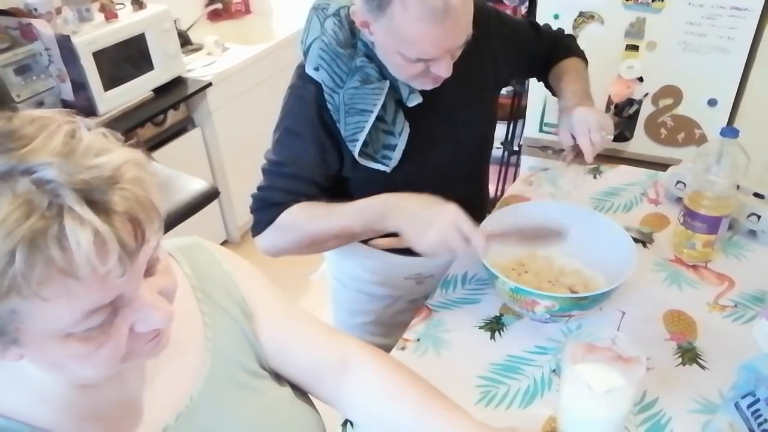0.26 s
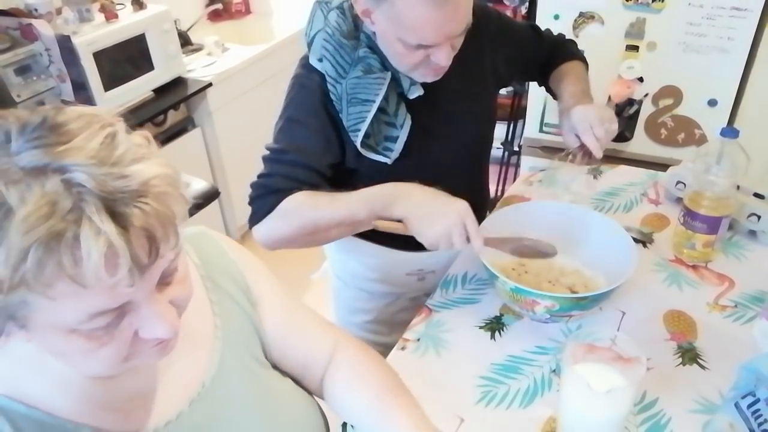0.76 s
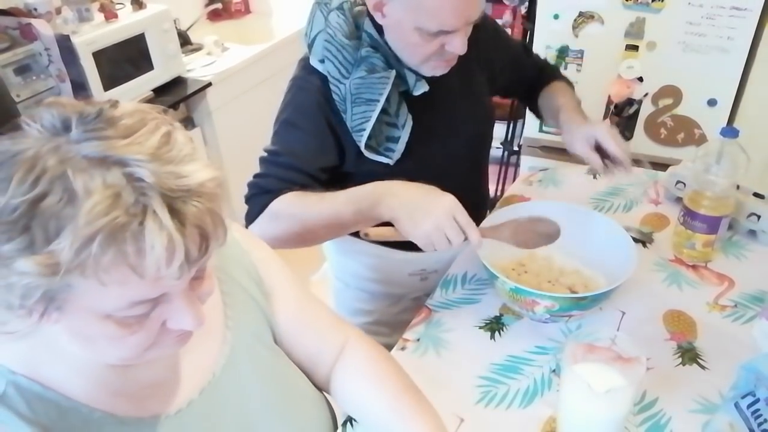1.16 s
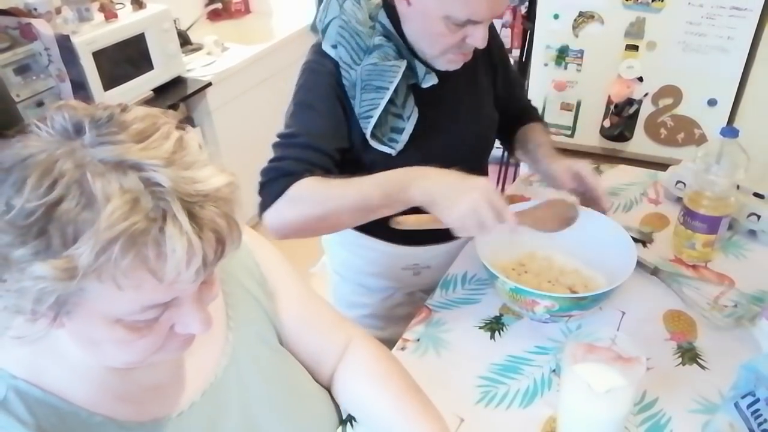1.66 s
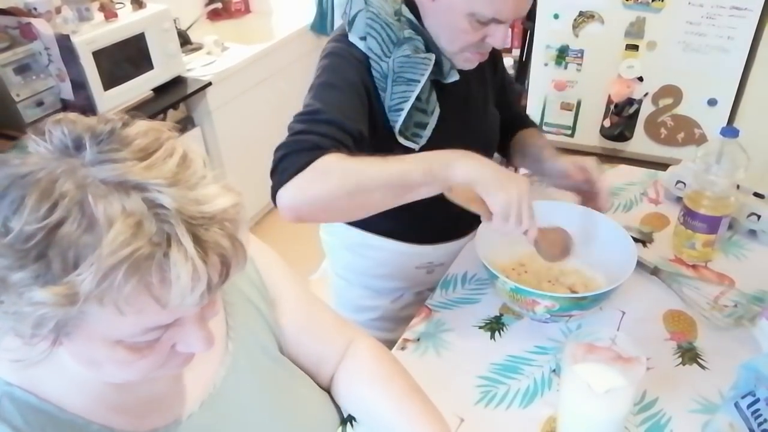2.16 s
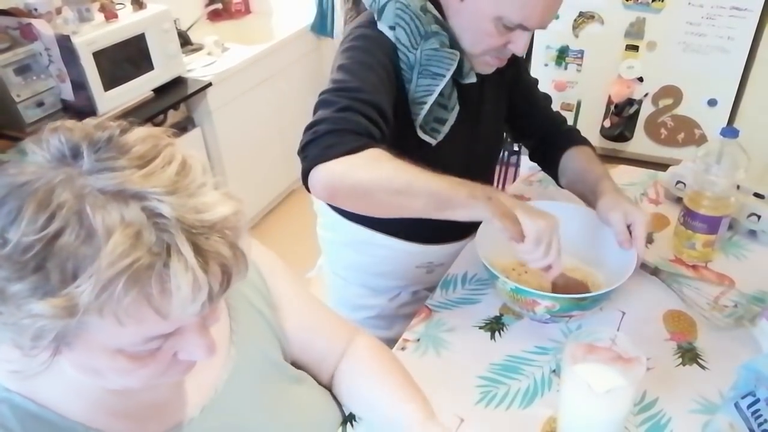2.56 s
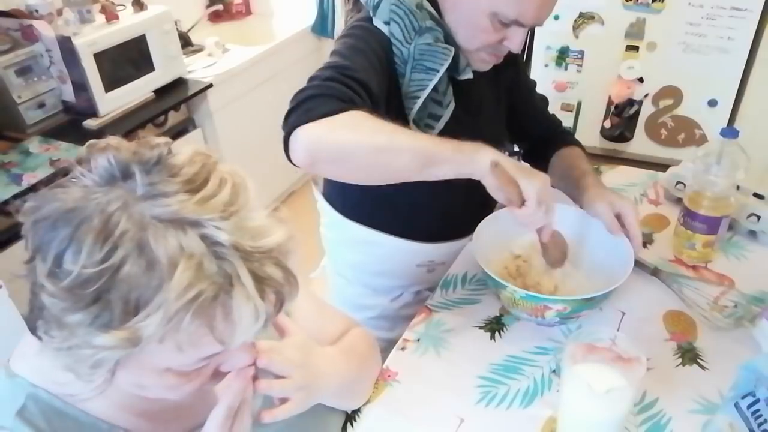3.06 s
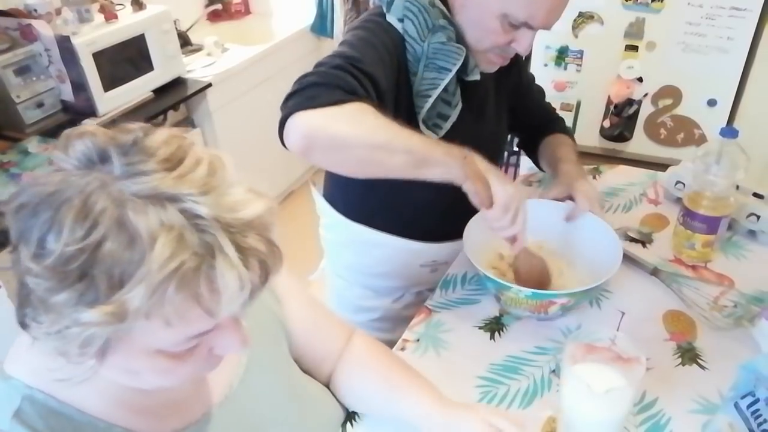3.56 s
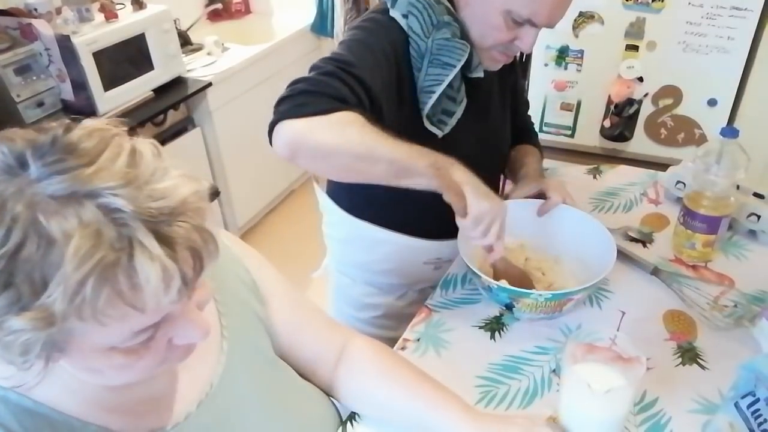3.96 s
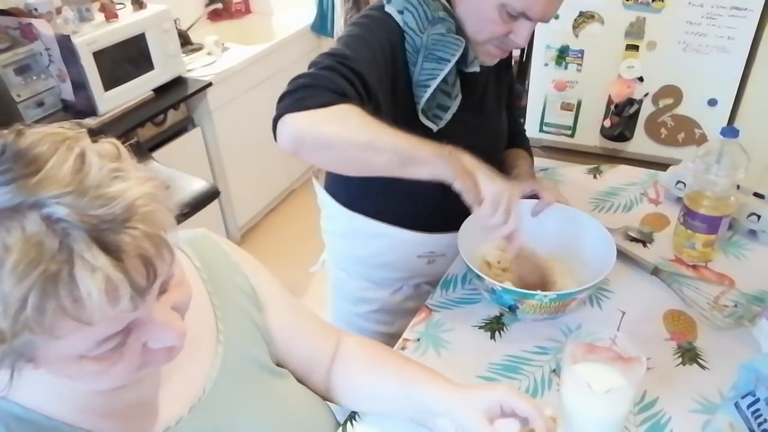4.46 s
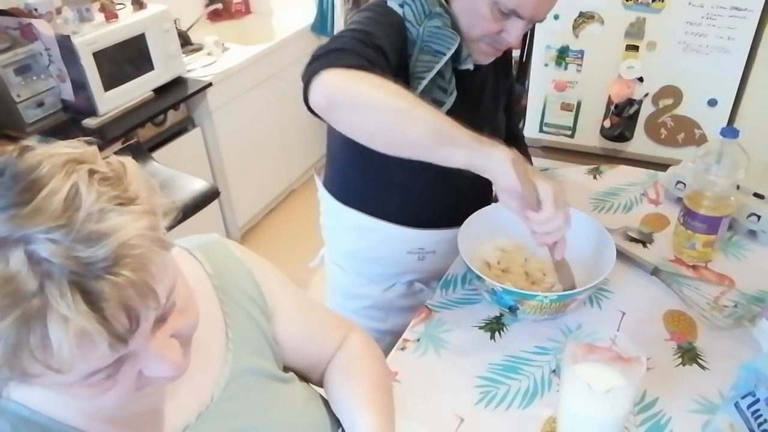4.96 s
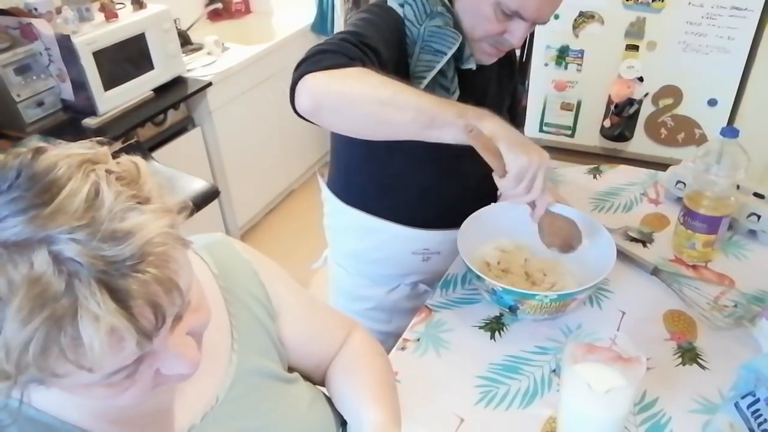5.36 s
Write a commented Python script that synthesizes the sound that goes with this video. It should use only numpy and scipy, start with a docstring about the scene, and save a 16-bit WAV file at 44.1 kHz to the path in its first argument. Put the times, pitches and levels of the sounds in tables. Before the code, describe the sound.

A small kitchen with faint air noise and a low hum is heard about a metre from the table, with most sounds slightly right of centre. For the first 1.5 seconds something rustles and crinkles in a hand, with light, sharp clicks and a few soft knocks on a plastic bowl between 0.6 and 0.9 seconds. At about 1.6 seconds a utensil lands hard on the table and bounces briefly, the loudest sound. A soft bump follows near 1.9 seconds. From 2.4 seconds a wooden spoon stirs batter, starting with a dull knock and gritty scraping round the bowl. Uneven thuds come thicker from 3.3 to 5 seconds, strongest around 3.8, 4.4, 4.7 and 5 seconds, with a light sliding hiss between them. Several small, bright clicks close the stirring from 5 to 5.5 seconds.

```python
"""A kitchen table, a metre or so from a stereo microphone, in a small, bright room with a low hum.
First things rustle and crinkle in the hand, with light clicks and a few soft knocks on a plastic bowl.
At about 1.6 s a utensil is put down hard on the table and bounces. From 2.4 s a wooden spoon works
batter, thudding through it against the bowl and scraping round the wall. More clicks come at the end."""
import sys
import numpy as np
from scipy import signal
from scipy.fft import rfft, irfft
from scipy.io import wavfile
from scipy.ndimage import uniform_filter1d

SR = 44100
rng = np.random.default_rng(int(sys.argv[2]) if len(sys.argv) > 2 else 0)


def digitize_waveform(pressure):
    """Quantize a signal to 16-bit integers and store it at the path in sys.argv[1].

    Rows of a 2-D input are taken as channels; values are limited to [-1, 1].
    """
    field = np.atleast_2d(pressure).T
    bounded = np.clip(field, -1, 1)
    quanta = np.round(bounded * 32767).astype(np.int16)
    wavfile.write(sys.argv[1], SR, quanta)


N = 246519
TIME = np.arange(N) / SR
RING_TIME = np.arange(SR * 3 // 4) / SR  # time axis of one hit and its decay


def undb(db):
    """Decibels to gain."""
    return 10 ** (np.asarray(db) / 20)


def unit_rms(x):
    """Scale to rms 1."""
    return x / np.sqrt(np.mean(x ** 2))


def unit_hit(x):
    """Scale a hit to the energy of 10 ms at rms 1."""
    return x / np.sqrt(np.sum(x ** 2) / (SR / 100))


def along(points, hz):
    """Read (Hz, value) points on a log-frequency axis."""
    point_hz, value = np.transpose(points)
    return np.interp(np.log(np.maximum(hz, 1)), np.log(point_hz), value)


def colour(x, points):
    """Minimum-phase filter with the given (Hz, dB) response."""
    size = 4096
    gain = undb(along(points, np.arange(size // 2 + 1) * SR / size))
    cepstrum = irfft(np.log(gain))
    cepstrum[1:size // 2] *= 2
    cepstrum[size // 2 + 1:] = 0
    impulse_response = irfft(np.exp(rfft(cepstrum)))
    return signal.fftconvolve(x, impulse_response)[:len(x)]


def lowpass(x, hz, order):
    """Butterworth low-pass."""
    return signal.sosfilt(signal.butter(order, min(hz, SR / 3), fs=SR, output="sos"), x)


def fade(t60):
    """Exponential decay by 60 dB in t60 seconds."""
    return np.exp(-np.log(1000) * RING_TIME / t60)


def ring(modes, longest_t60=.38):
    """Struck modes, each dying away within longest_t60; neighbours swing in opposite senses."""
    return sum((-1) ** k * undb(db) * fade(min(t60, longest_t60)) * np.sin(2 * np.pi * hz * RING_TIME)
               for k, (hz, db, t60) in enumerate(modes))


def add(track, start, x):
    """Mix x into the track from start, in seconds."""
    i = int(start * SR)
    track[i:i + len(x)] += x[:N - i]


def pan(x, right_db):
    """Make the right channel right_db louder than the left."""
    return x * undb(np.array([[-right_db], [right_db]]) / 2)


def wander(rate_hz):
    """Random drift of rms 1 that takes a new turn rate_hz times a second."""
    hold = int(SR / rate_hz)
    steps = np.repeat(rng.standard_normal(N // hold + 1), hold)
    return unit_rms(uniform_filter1d(steps, hold)[:N])


def diffuse(size, alike_hz=700):
    """Noise from all round the microphone: the bass is alike in both channels, the treble unrelated."""
    hz = np.arange(size // 2 + 1) * SR / size
    alike = .85 / (1 + (hz / alike_hz) ** 4)
    mid, side = rfft(rng.standard_normal((2, size)))
    common = mid * np.sqrt((1 + alike) / 2)
    opposed = side * np.sqrt((1 - alike) / 2)
    return irfft(np.array([common + opposed, common - opposed]), size)


def gesture(start, length, attack_s, t60):
    """Envelope of one movement: attack, hold, release."""
    t = TIME - start
    release = np.exp(-np.log(1000) * np.maximum(t - length, 0) / t60)
    return np.clip(t / attack_s, 0, 1) * release


def friction(spectrum):
    """Countless tiny slips of uneven size, reaching the microphone mostly by way of the walls."""
    slips = undb(2 * wander(600) + .8 * wander(35))
    return unit_rms(np.array([colour(channel * slips, spectrum) for channel in diffuse(N)]))


# air of the quiet kitchen: (frequency [Hz], relative level [dB])
AIR_SPECTRUM = [(12, -42), (25, -6), (60, -8), (130, -2.5), (200, -13.5), (370, -12.5), (700, -18),
                (1050, -19), (1400, -25.5), (2900, -26.5), (4200, -33.5), (5200, -26), (7500, -29.5),
                (9000, -38), (13000, -39), (15000, -39.5)]
# faint tones that come and go: (start [s], length [s], frequency [Hz], peak level [dB])
FAINT_TONES = [(0.187, 0.25, 357, -64.5), (0.522, .13, 426, -70), (1.818, 0.28, 372.5, -62),
               (1.95, 0.25, 835, -72.5)]


def room_tone(air_db=-63.5, hum_hz=93, hum_db=-73):
    """Quiet air all round the microphone, with a low wavering hum and a few faint tones in the centre."""
    air = unit_rms(np.array([colour(channel, AIR_SPECTRUM) for channel in diffuse(N)]))
    air *= undb(air_db + .6 * wander(3))
    hum_phase = 2 * np.pi * np.cumsum(hum_hz + 3 * wander(6)) / SR
    tones = np.sin(hum_phase) * undb(hum_db + 2.5 * wander(3.6))
    for start, length, hz, db in FAINT_TONES:
        t = TIME[:int(length * SR)]
        swell = undb(db) * np.sin(np.pi * t / length)
        add(tones, start, swell * np.sin(2 * np.pi * hz * t))
    return air + tones


# movements of the hand: (start [s], length [s], level [dB])
HAND_MOVES = [(0.035, 0.12, -71), (0.129, 0.07, -61.5), (1.025, .19, -58), (1.371, .17, -59.5)]
# things rubbing in the hand: (frequency [Hz], relative level [dB])
RUSTLE_SPECTRUM = [(100, -55), (400, -30), (1200, -12), (3000, -1), (4200, -10), (5500, 5), (7800, 1),
                   (10000, -12), (15000, -11)]


def rustle(attack_s=0.014, t60=0.33):
    """Things shift in the hand and rub together, centred ahead of the microphone."""
    effort = sum(undb(db) * gesture(start, length, attack_s, t60) for start, length, db in HAND_MOVES)
    return friction(RUSTLE_SPECTRUM) * effort


def crinkles(count=5, below_rustle_db=6, scatter_db=3.5, ring_hz=6100, spread_octaves=0.34):
    """A few tiny clicks fall at random in each rustle; returns rows like those of LIGHT_CLICKS."""
    body_db, snap_db, clink_db = -8, -2, -20
    rows = []
    for start, length, rustle_db in HAND_MOVES:
        for when, (size, pitch) in zip(rng.random(count), rng.standard_normal((count, 2))):
            db = rustle_db - below_rustle_db + scatter_db * size
            hz = ring_hz * 2 ** (spread_octaves * pitch)
            rows.append((start + when * length, db, hz, body_db, snap_db, clink_db))
    return rows


# light hard contacts, the last three columns relative to the ring:
# (time [s], level [dB], ring pitch [Hz], body [dB], snap [dB], clink [dB])
LIGHT_CLICKS = [(.245, -43.5, 8040, -24, -12, -20), (.2485, -39.5, 5460, -17, -21, -20),
                (.511, -41.5, 5000, -18, -4, 7), (.7542, -42.5, 4880, -25, -7, -1.5),
                (.9875, -42.5, 5240, -36, -10, -4), (1.024, -43, 4470, 6, 1.5, -20),
                (1.028, -45, 5560, -3, 4, -20), (1.037, -42, 5330, -7, -5, -20),
                (1.049, -44.5, 5840, -13, 2, -22), (1.085, -43, 5500, -34, -5, -25),
                (1.1542, -50, 6500, -6, 2.5, -16), (1.170, -43, 5900, -14.5, -21, -27),
                (1.175, -45, 5400, -5, 7, -22), (1.209, -49.5, 5570, -15, -9, -31),
                (1.369, -72, 6500, 17, 17, -20), (1.4096, -40.5, 5170, -6.5, -3.5, -9),
                (1.4349, -50, 5200, 8.5, 10, -26), (3.349, -57.5, 5770, -9, -5, -10),
                (4.387, -66, 5500, -6, -11, -18), (4.745, -51.5, 6940, -15, -4, -9),
                (5.0408, -49.5, 7200, 7, 25, -20), (5.229, -58, 5900, -15, -9, -21),
                (5.3369, -42, 5680, -22.5, -15, -31), (5.4124, -45, 5800, -18, -8.5, -11),
                (5.4442, -47.5, 6860, -31, 12, 0), (5.4916, -38.5, 5780, -10.5, -11.5, -38)]
# damped ring of a click: (frequency [multiple of the ring pitch], relative level [dB])
CLICK_PARTIALS = [(0.591, -4), (0.791, -2.5), (0.997, -0.5), (1.28, -7.5)]
# mid-range body and bright snap of a click, each: (frequency [Hz], relative level [dB])
BODY_SPECTRUM = [(300, -50), (700, -1), (1200, -2), (1900, 2.5), (2900, 11), (3600, 8), (5000, -5.5),
                 (9000, -8)]
SNAP_SPECTRUM = [(2000, -55), (6000, 2.5), (9000, 4), (12000, -3), (15000, -1.5), (16000, -34)]
# clink that lingers after a click: (frequency [Hz], relative level [dB], t60 [s])
CLINK_MODES = [(1620, -22.5, 0.031), (2805, -6, 0.034), (3100, -11, .02), (3850, -3, .02), (4380, -15, .02),
               (4960, 4, 0.034), (5200, 2.5, 0.023), (5400, -21, 0.027), (6190, 6, .03), (6660, 6, 0.02),
               (7140, -7, 0.026), (7180, -2.5, 0.039), (7900, -5.5, .035), (8260, -7.5, 0.018)]


def clicks(ring_t60=0.0016, clink_scatter_db=6.0):
    """Hard contacts right of centre, each with a damped ring, a body, a snap and a lingering clink."""
    direct = np.zeros(N)
    tick = signal.unit_impulse(len(RING_TIME))
    body = unit_hit(colour(tick, BODY_SPECTRUM))
    snap = unit_hit(colour(tick, SNAP_SPECTRUM))
    clink_partials = np.array([(-1) ** k * ring([mode]) for k, mode in enumerate(CLINK_MODES)])
    contacts = list(LIGHT_CLICKS) + crinkles()
    spots = rng.standard_normal((len(contacts), len(CLINK_MODES)))  # each spot brings out other modes
    for (start, db, ring_hz, body_db, snap_db, clink_db), spot in zip(contacts, spots):
        modes = [(ring_hz * ratio, mode_db, ring_t60) for ratio, mode_db in CLICK_PARTIALS]
        tone = unit_hit(lowpass(np.diff(ring(modes), prepend=0), 8500, order=8))
        clink = unit_hit(undb(clink_scatter_db * spot) @ clink_partials)
        click = tone + undb(body_db) * body - undb(snap_db) * snap + undb(clink_db) * clink
        add(direct, start, undb(db) * unit_hit(click))
    return pan(table_top(direct, echo_db=3, t60=.02) + kitchen(direct), right_db=4.5)


def table_top(x, echo_db, t60=0.013):
    """Direct sound at the microphone with a brief scatter off the table and the things standing on it."""
    scatter = diffuse(len(RING_TIME)) * fade(t60)
    scatter /= np.linalg.norm(scatter, axis=1, keepdims=True)
    echoes = signal.fftconvolve(x[None], scatter, axes=1)[:, :N]
    return (x + undb(echo_db) * echoes) / np.hypot(1, undb(echo_db))


# decay of the small kitchen: (band centre [Hz], t60 [s])
KITCHEN_DECAY = [(100, 0.41), (400, 0.2), (1200, 0.34), (3000, 0.31), (7000, 0.29), (15000, 0.24)]


def kitchen(x, gap_s=0.0043, build_s=0.00067):
    """Reverberation reaches the microphone a few ms after the direct sound; the bass lasts longest."""
    size = len(RING_TIME)
    hz = np.arange(size // 2 + 1) * SR / size
    noise_spectrum = rfft(diffuse(size))
    centres = np.array(KITCHEN_DECAY)[:, 0]
    onset = np.clip((RING_TIME - gap_s) / build_s, 0, 1)
    tail = 0
    for share, (_, t60) in zip(np.eye(len(centres)), KITCHEN_DECAY):
        band = irfft(noise_spectrum * along(np.c_[centres, share], hz), size)
        envelope = fade(t60) * onset
        tail = tail + band * envelope / np.linalg.norm(envelope)
    return signal.fftconvolve(x[None], tail, axes=1)[:, :N]


# spoon against the bowl, the last three columns as trims on each part's own gain:
# (time [s], level [dB], contact cut-off [Hz], table thump [dB], wall rattle [dB], thud into room [dB])
SPOON_KNOCKS = [(.597, -49.5, 84.4, -4, -20.5, 0), (0.657, -54, 122, 6, -42, 1),
                (0.875, -58, 120, -4, -41, 5), (1.941, -45.5, 210, 9.5, -30, 1),
                (2.412, -29.5, 700, -8, -28.5, -3), (3.285, -42, 265, -28, -24, 3),
                (3.338, -53.5, 382, 9.5, -22, 11), (3.738, -47.5, 251, -21, -32, 8.5),
                (3.758, -29.5, 634, -21, -18.5, -0.5), (3.84, -39.5, 243, -4.5, -26, -6),
                (4.277, -35.5, 700, -8.5, -36, 0.5), (4.384, -31.5, 300, 1.5, -28, -1.5),
                (4.480, -46, 141, -6, -39, -4), (4.506, -46.5, 396, 13, -37, -1),
                (4.612, -44.5, 270, 10, -27, 3.5), (4.647, -47, 513, 6, -10, 1.5),
                (4.686, -32.5, 251, 0, -43, -4), (4.990, -29, 1460, -14.5, -45, -5)]
# the bowl, the table under it and the bowl's rattling wall, each:
# (frequency [Hz], relative level [dB], t60 [s], capped at longest_t60)
BOWL_MODES = [(207.8, 2.5, 0.043), (215.4, -3, 0.16), (252, -21, 0.9), (347, -15, 0.45), (367, -16, 0.43),
              (422, 7, 0.039), (493, -6.5, 0.096), (537, -5.5, 0.22), (633.3, -1, 0.1), (624, 7, 0.039),
              (732, -7.5, 0.18), (784, 5.5, 0.025), (1083, 7.5, 0.028)]
TABLE_MODES = [(77.5, 0, 0.27), (92, -0.5, 0.045), (124.7, -8.5, 0.18), (171, -15, 0.054)]
WALL_MODES = [(2140, 12, 0.014), (2420, 4, 0.033), (2650, -2.5, 0.06), (3336, 4, 0.032), (6900, -2, 0.0018)]


def bowl_knocks(rebound_s=.029, rebound_octaves=0.1966, rebound_db=-12.5, rebound_softer=0.73,
                flex_share=0.829, flex_top_hz=493, flex_db=2, flex_cycles=17,
                table_db=-9.5, wall_db=-3.0, rattle_room_db=4):
    """The spoon meets the bowl and rebounds once; batter lengthens the contact and so dulls the blow."""
    thuds, room_feed, rattles = np.zeros((3, N))
    bowl, table = ring(BOWL_MODES), undb(table_db) * ring(TABLE_MODES)
    spots = rng.standard_normal((len(SPOON_KNOCKS), len(WALL_MODES)))
    for (start, db, contact_hz, thump_db, rattle_db, room_db), spot in zip(SPOON_KNOCKS, spots):
        rebound_delay = rebound_s * 2 ** (rebound_octaves * spot[-1])
        contacts = [(0, 0, contact_hz), (rebound_delay, rebound_db, contact_hz * rebound_softer)]
        for delay, drop_db, cutoff_hz in contacts:
            # the struck spot flexes faster under a harder contact, up to the wall's own pitch
            flex_hz = min(flex_share * cutoff_hz, flex_top_hz)
            flex = ring([(flex_hz, flex_db, flex_cycles / flex_hz)])
            cushioned = lowpass(bowl + undb(thump_db) * table - flex, cutoff_hz, order=3)
            thud = undb(db + drop_db) * unit_hit(lowpass(cushioned, 947, order=5))
            add(thuds, start + delay, thud)
            add(room_feed, start + delay, undb(room_db) * thud)
        # the load of batter detunes the wall a little from blow to blow
        wall = ring([(hz * (1 + .015 * shift), mode_db, t60)
                     for (hz, mode_db, t60), shift in zip(WALL_MODES, spot)])
        add(rattles, start, undb(db + rattle_db + wall_db) * unit_hit(np.diff(wall)))
    near = thuds + table_top(rattles, echo_db=29.5)
    room = kitchen(room_feed + undb(rattle_room_db) * rattles)
    return pan(near + room, right_db=5)


# utensil meeting the table, from first touch to last drop:
# (time [s], level [dB], contact cut-off [Hz], gap to first bounce [s], loss per bounce [dB])
UTENSIL_LANDINGS = [(1.531, -47.5, 5000, .014, 2.5), (1.5878, -24.5, 5630, 0.0067, 27),
                    (1.614, -39, 3400, .014, 1.5), (1.670, -38.5, 1470, .041, 4)]
# utensil ringing on the table: (frequency [Hz], relative level [dB], t60 [s], capped at longest_t60)
UTENSIL_MODES = [(199, -10.5, 0.077), (245.7, -22, 0.64), (344, -17.5, 0.14), (468.7, -1.5, 0.077),
                 (530, -4.5, 0.074), (645, 2.5, 0.02), (790, 4, 0.03), (836, 12, 0.011),
                 (1205, -6.5, 0.055), (1317, 0.5, 0.017), (1447, -11, 0.054), (1496, -3, 0.032),
                 (1680, -1.5, 0.013), (1770, -0.5, 0.035), (2170, -5.5, 0.017), (2500, 0.5, 0.019),
                 (2720, -23, 0.029), (3320, -41, 0.018), (4340, -17.5, 0.035), (5780, -4.5, 0.012),
                 (7160, -9, 0.0068)]


def utensil(crack_db=-6, room_db=-1, bounces=3, gap_shrink=.7, bounce_softer=0.66):
    """A hard utensil touches the table, lands with a crack and bounces ever sooner and more softly."""
    # (frequency [Hz], relative level [dB])
    crack_spectrum = [(200, -0.5), (700, 4.5), (2700, -2.0), (3400, -14.5), (6200, -13.0), (8500, -24.5)]
    crack = colour(signal.unit_impulse(len(RING_TIME)), crack_spectrum)
    clack = unit_hit(ring(UTENSIL_MODES)) + undb(crack_db) * unit_hit(crack)
    direct = np.zeros(N)
    for start, db, contact_hz, gap, loss_db in UTENSIL_LANDINGS:
        add(direct, start, undb(db) * unit_hit(lowpass(clack, contact_hz, order=2)))
        bounce = unit_hit(lowpass(clack, contact_hz * bounce_softer, order=2))
        delays = np.cumsum(gap * gap_shrink ** np.arange(bounces))
        for k, delay in enumerate(delays, 1):
            add(direct, start + delay, undb(db - k * loss_db) * bounce)
    direct = lowpass(direct, 6900, order=8)
    return pan(table_top(direct, echo_db=-6) + undb(room_db) * kitchen(direct), right_db=5)


# strokes of the spoon round the bowl: (start [s], length [s], scrape level [dB], hiss level [dB])
SPOON_STROKES = [(2.399, 0.093, -62.5, -71), (2.591, 0.2, -59, -66), (2.779, 0.16, -52, -57.5),
                 (3.292, 0.2, -60, -74), (3.556, .13, -72, -69.5), (3.74, 0.27, -63, -68),
                 (4.093, .05, -69.5, -72.5), (4.341, 0.1, -57, -67.5), (4.559, 0.2, -63.5, -55),
                 (4.731, 0.21, -67, -53.5), (5.037, 0.019, -60, -57), (5.139, 0.11, -71.5, -68)]
# scrape against the wall and fine hiss of sliding, each: (frequency [Hz], relative level [dB])
SCRAPE_SPECTRUM = [(200, -2.5), (450, -6), (650, 5.5), (900, -2.5), (1150, -4.5), (1500, -7.5),
                   (2300, -5.5), (3150, 1), (4150, -9.5), (5500, -2.5), (7200, -6.5), (9500, -23),
                   (15000, -23)]
HISS_SPECTRUM = [(1500, -35), (4200, -12.5), (6000, 2.5), (7400, 7), (9000, -3), (11000, -3.5), (13500, -3),
                 (14900, 3.5), (16000, -2)]


def stirring(attack_share=0.32, arch_db=1, t60=.38):
    """The spoon drags gritty batter round the wall, right of centre; quick light slides hiss higher."""
    press, slide = np.zeros((2, N))
    for start, length, scrape_db, hiss_db in SPOON_STROKES:
        progress = np.clip((TIME - start) / length, 0, 1)
        arch = np.sin(np.pi * progress) - 2 / np.pi  # the spoon presses hardest halfway
        stroke = gesture(start, length, attack_share * length, t60) * undb(arch_db * arch)
        press += undb(scrape_db) * stroke
        slide += undb(hiss_db) * stroke
    scrape = pan(friction(SCRAPE_SPECTRUM) * press, right_db=3.5)
    hiss = pan(friction(HISS_SPECTRUM) * slide, right_db=3.0)
    return scrape + hiss


def scene():
    """The kitchen as it sounds a metre or so from the table."""
    return bowl_knocks() + utensil() + clicks() + stirring() + rustle() + room_tone()


def record(dry):
    """The left microphone is livelier near 8 kHz, the right at the very top; above 15.9 kHz is cut."""
    # (frequency [Hz], left gain [dB]); the right side gets the opposite gain
    lean = np.array([(2500, -0.5), (4000, -1), (6000, -1.6), (8000, 5.0), (11000, 0.5), (15000, -2.0)])
    channels = np.array([colour(dry[0], lean), colour(dry[1], lean * [1, -1])])
    top_cut = signal.ellip(10, .2, 70, 15900, fs=SR, output="sos")
    return signal.sosfilt(top_cut, channels)


dry = scene()
out = record(dry)
digitize_waveform(out)
```